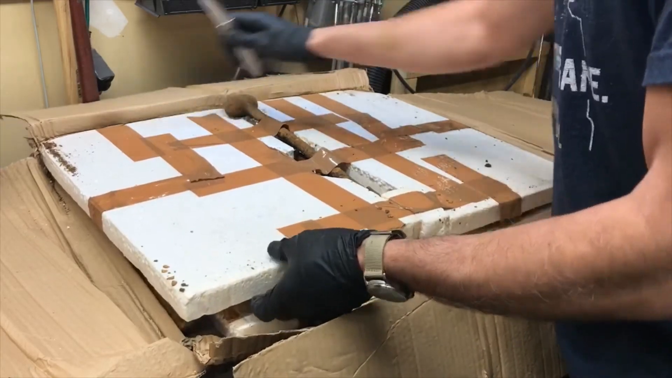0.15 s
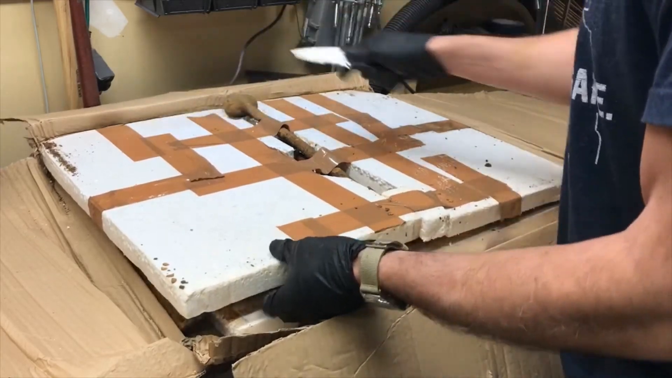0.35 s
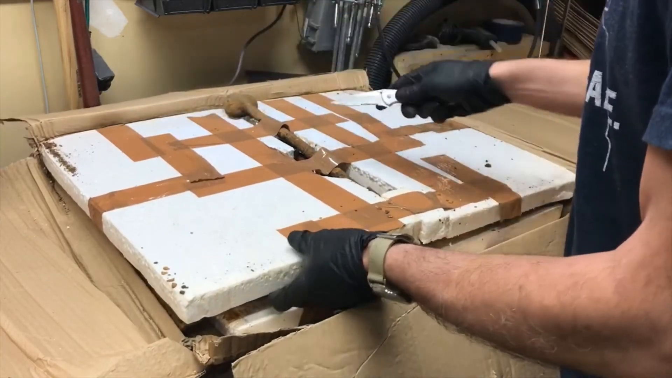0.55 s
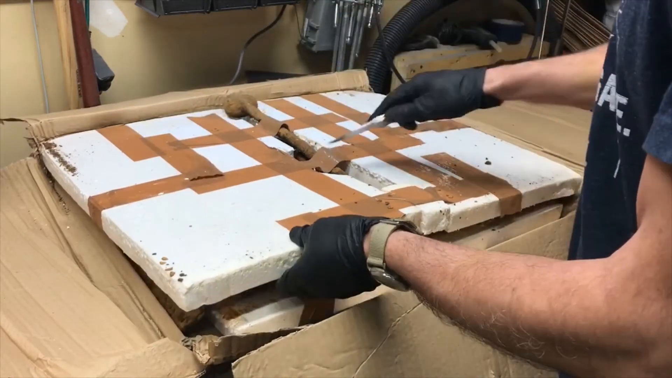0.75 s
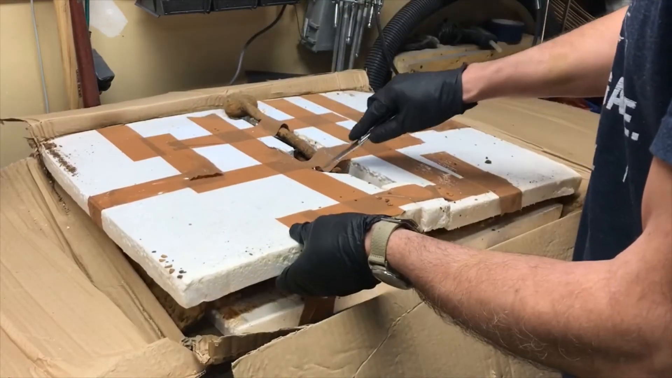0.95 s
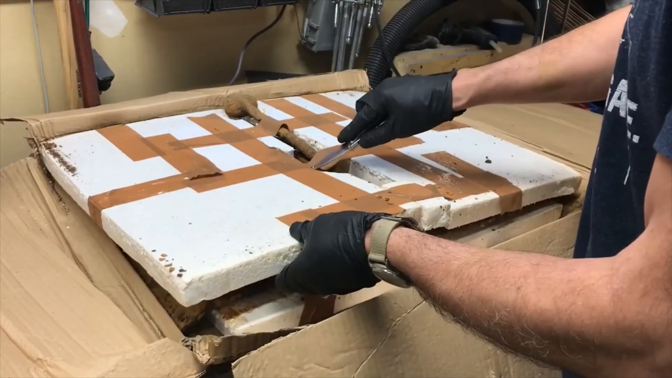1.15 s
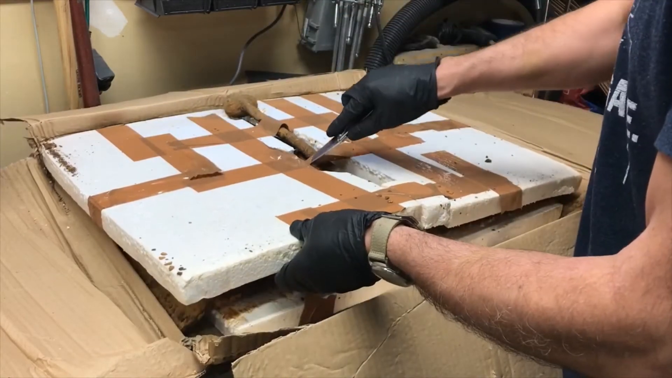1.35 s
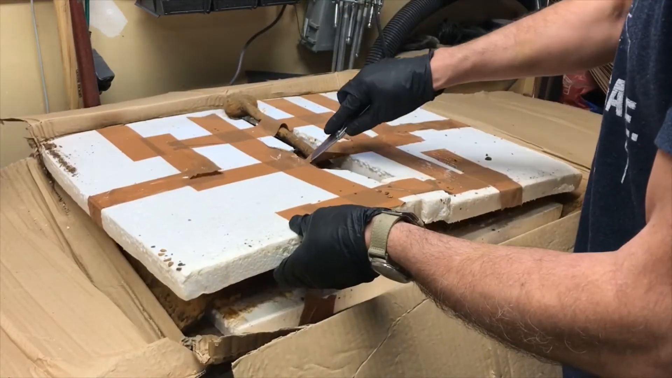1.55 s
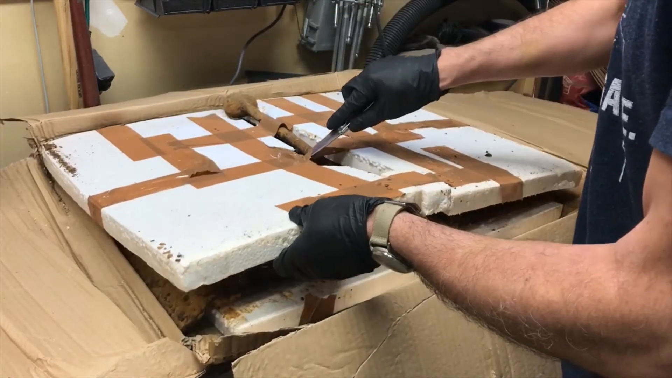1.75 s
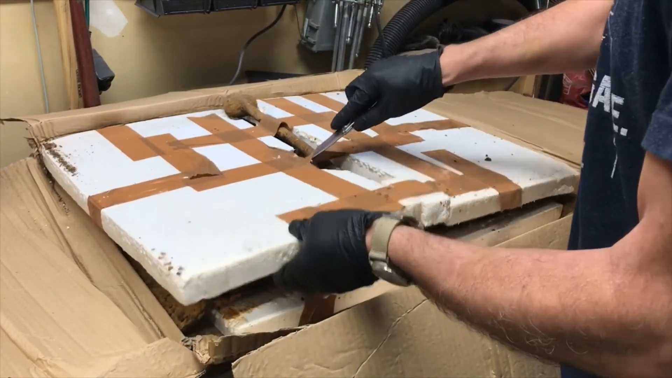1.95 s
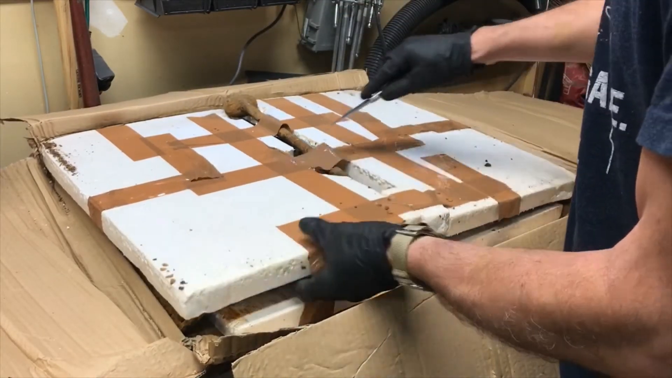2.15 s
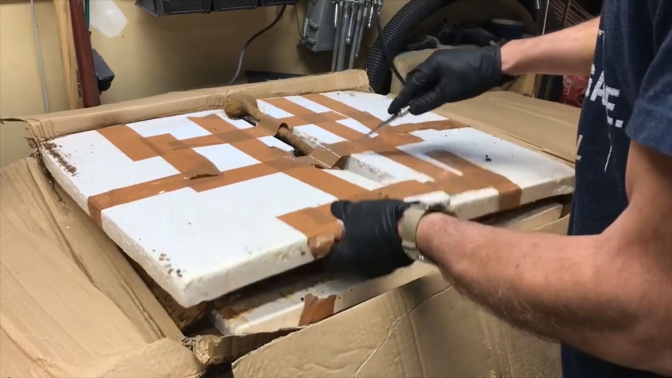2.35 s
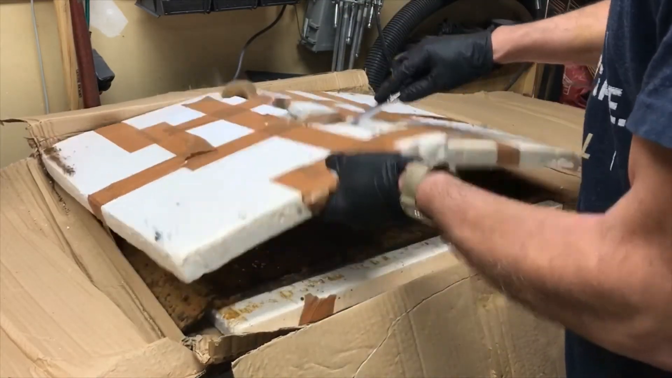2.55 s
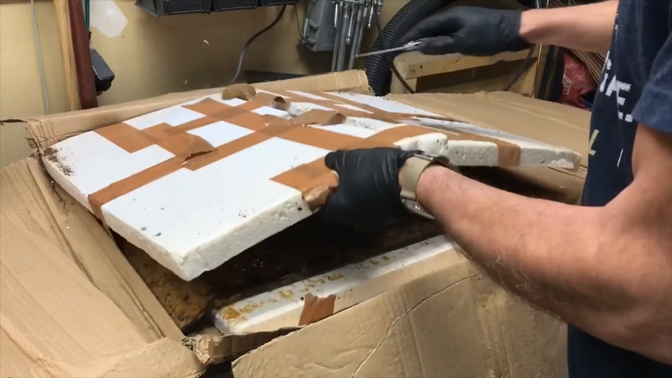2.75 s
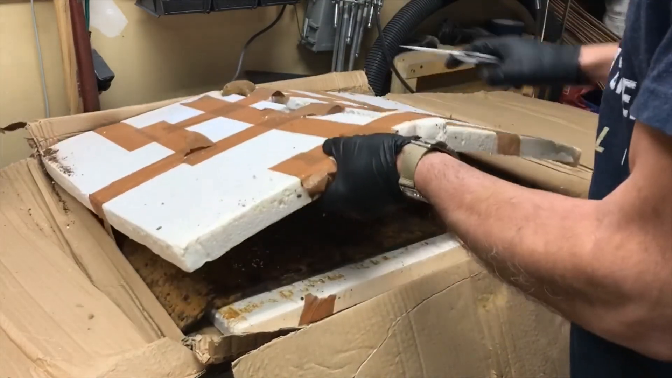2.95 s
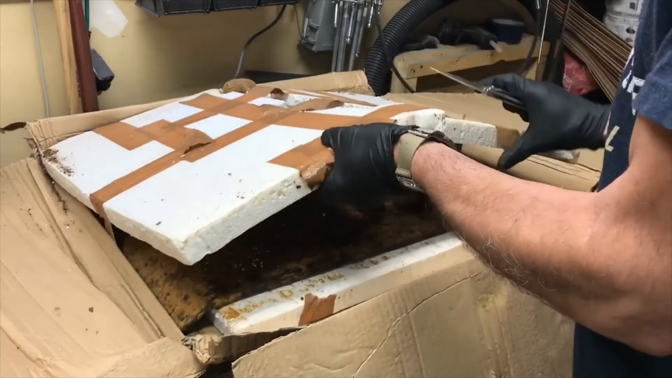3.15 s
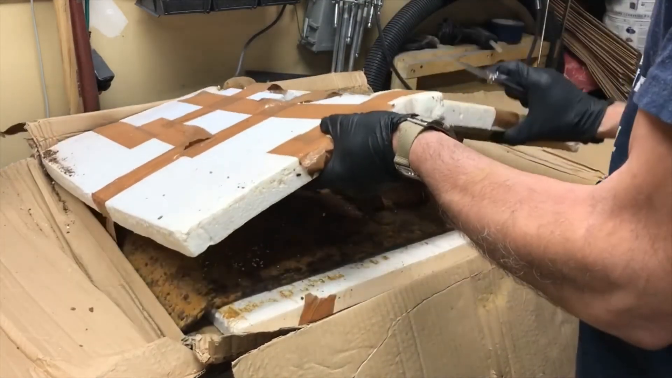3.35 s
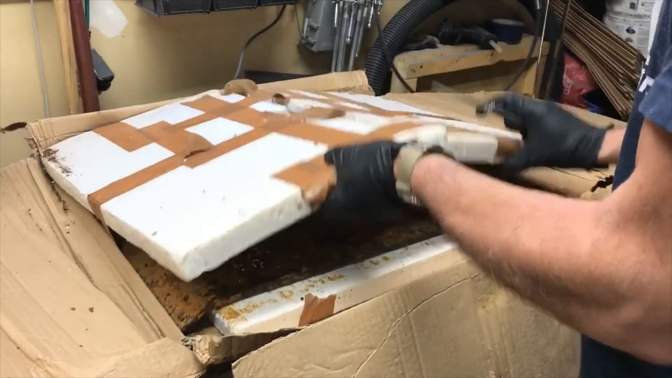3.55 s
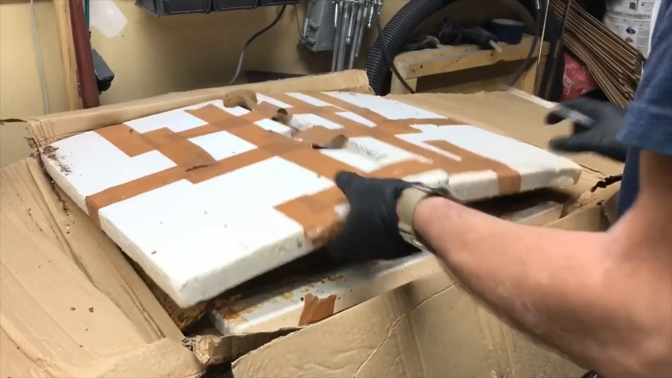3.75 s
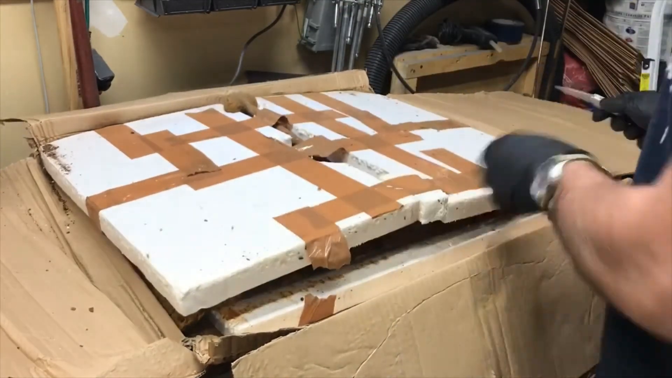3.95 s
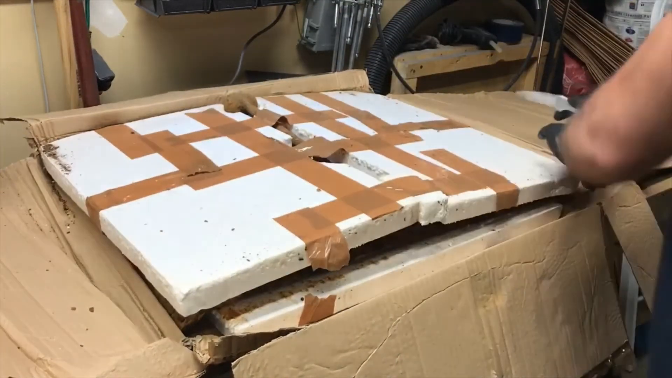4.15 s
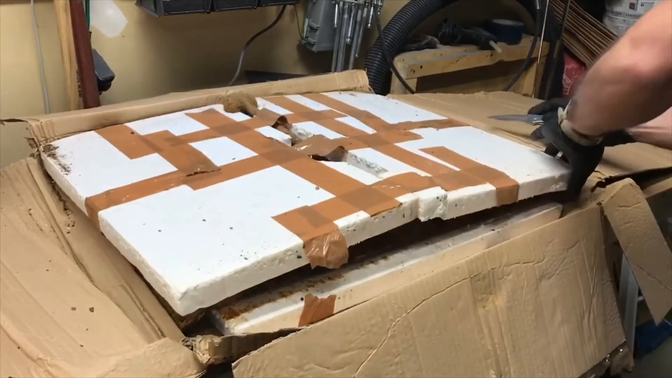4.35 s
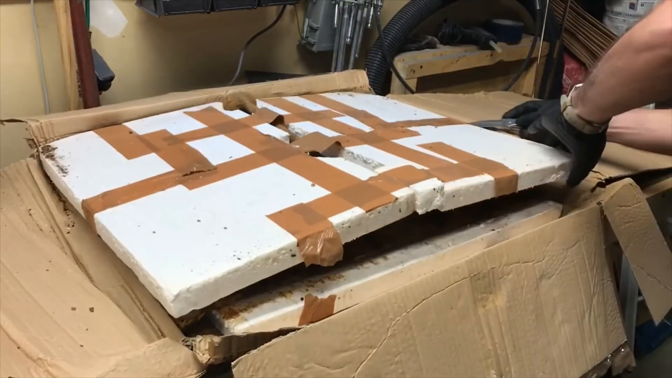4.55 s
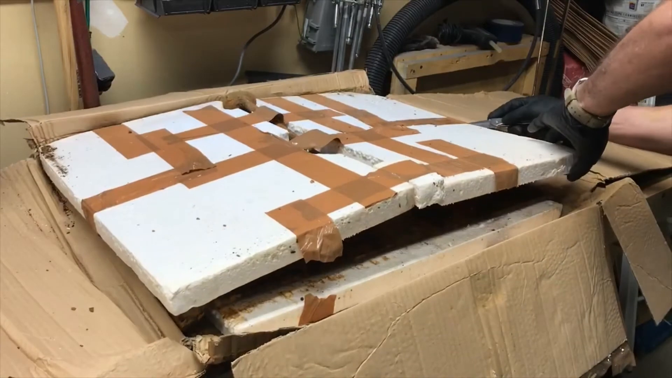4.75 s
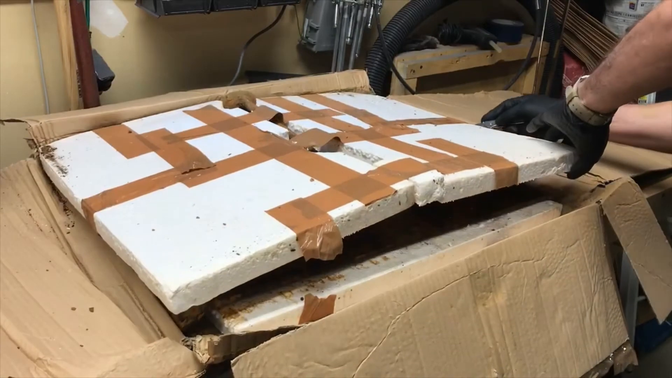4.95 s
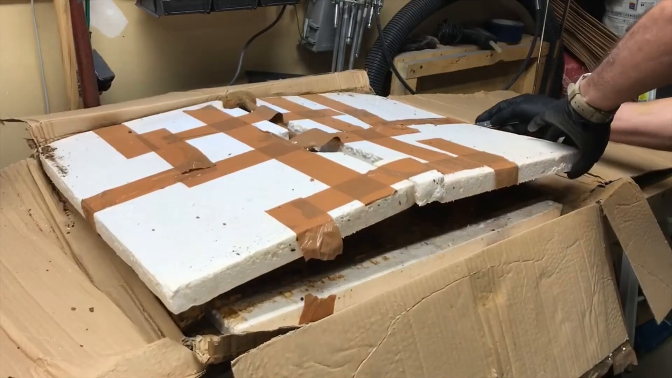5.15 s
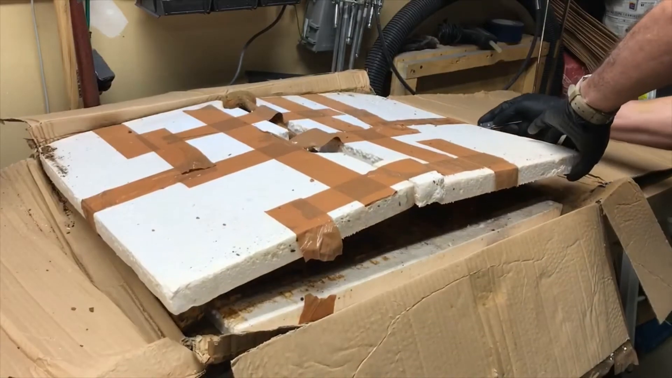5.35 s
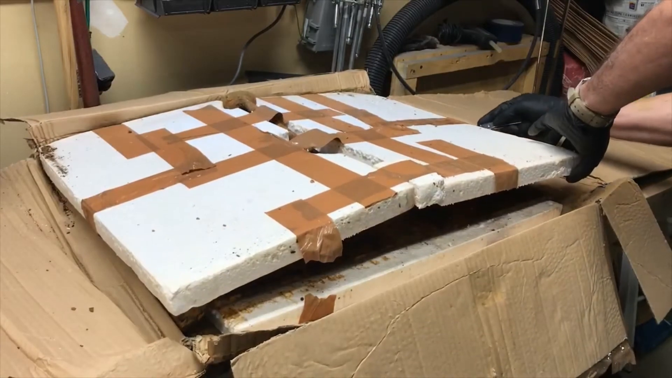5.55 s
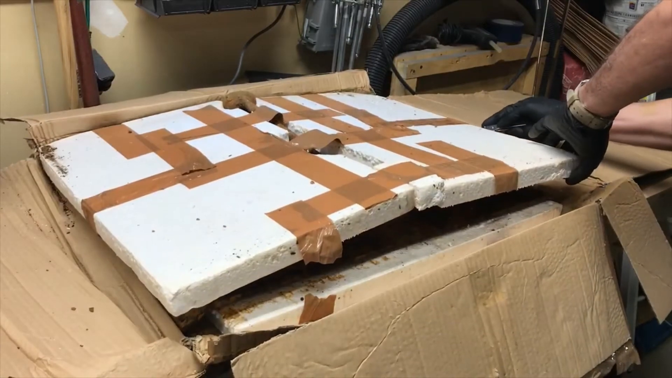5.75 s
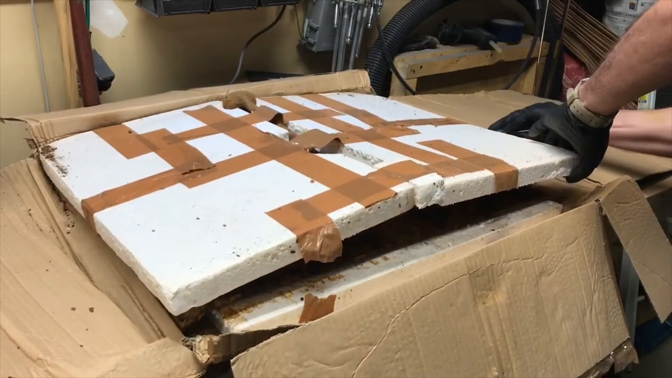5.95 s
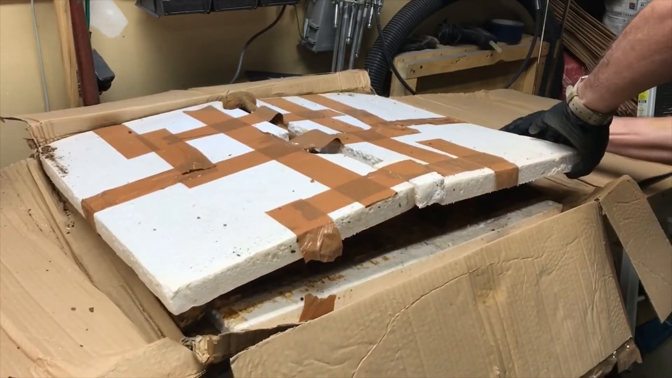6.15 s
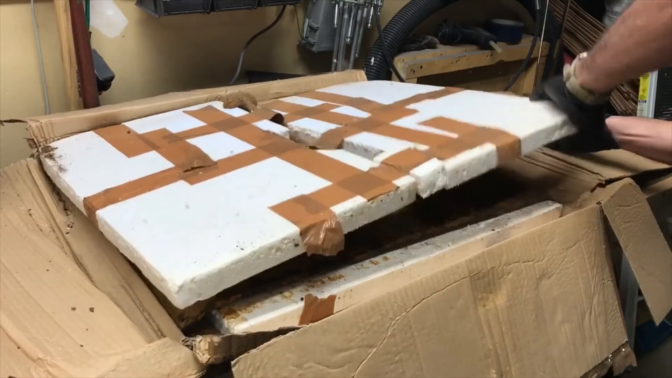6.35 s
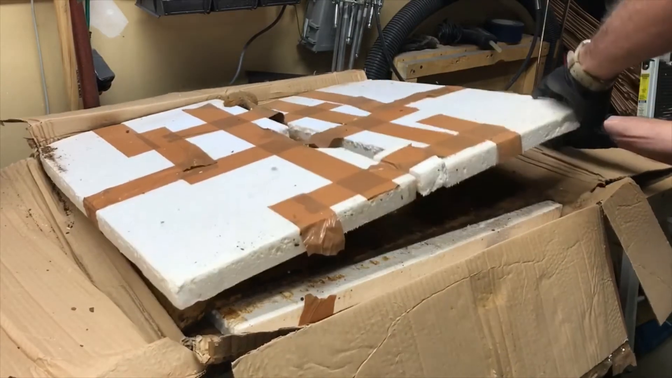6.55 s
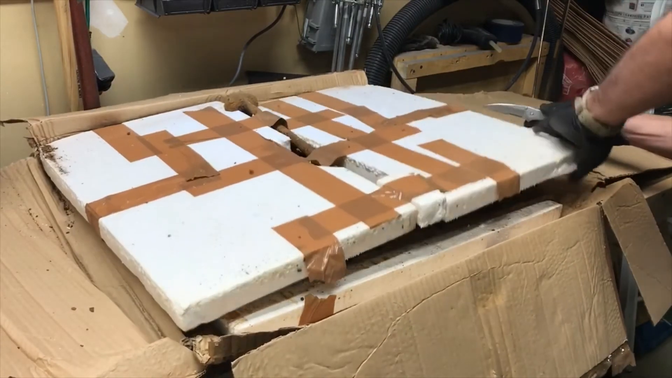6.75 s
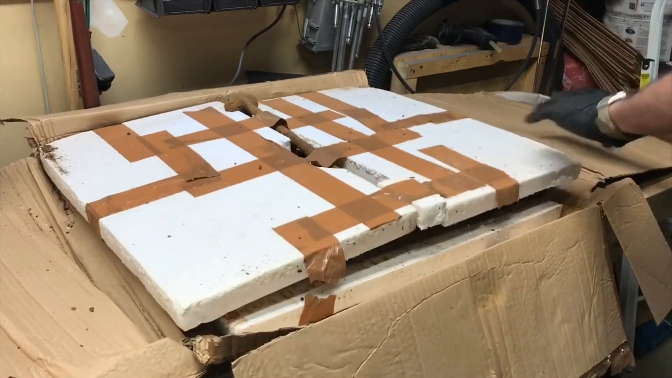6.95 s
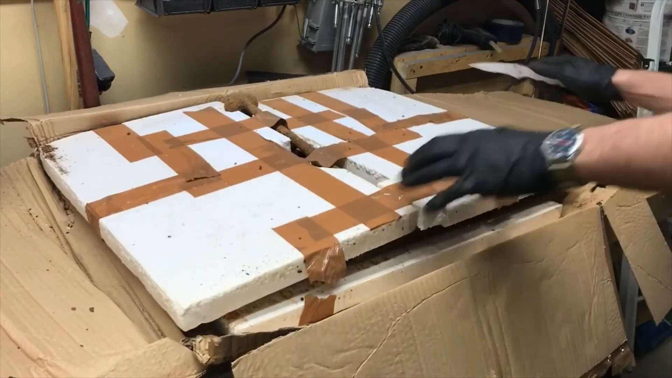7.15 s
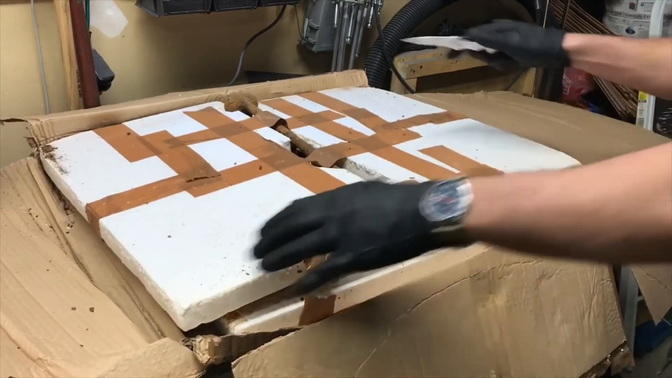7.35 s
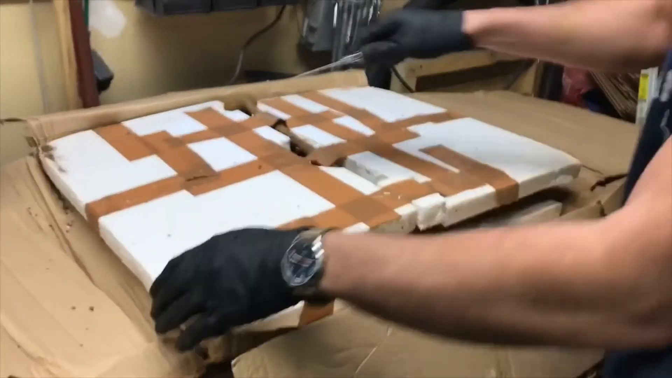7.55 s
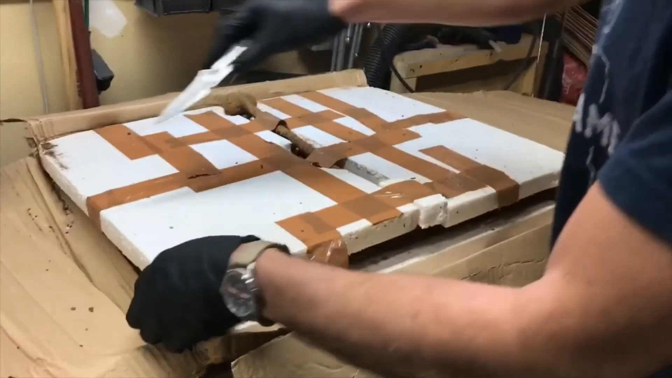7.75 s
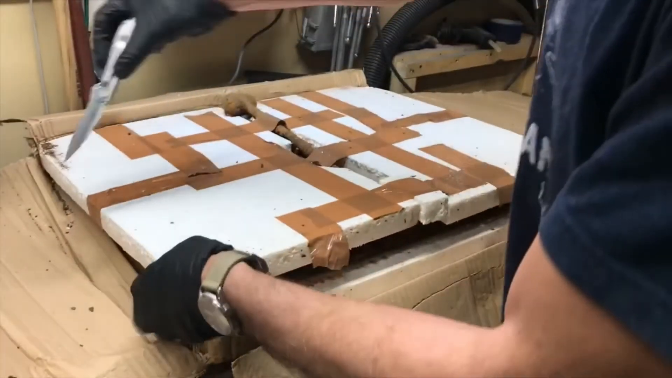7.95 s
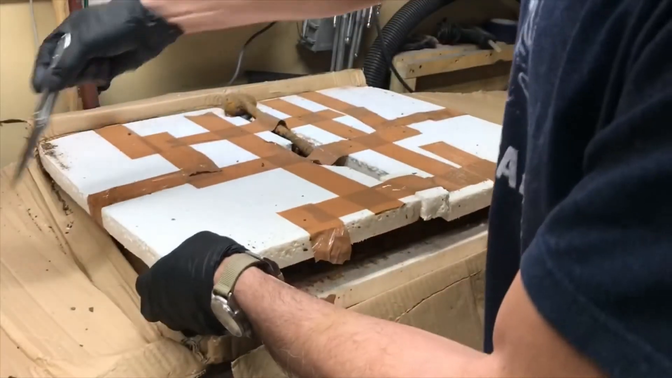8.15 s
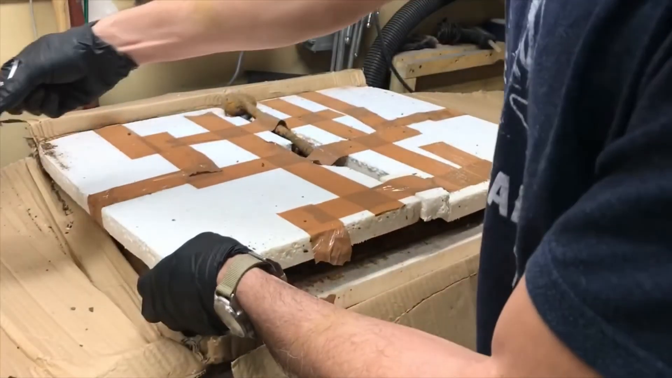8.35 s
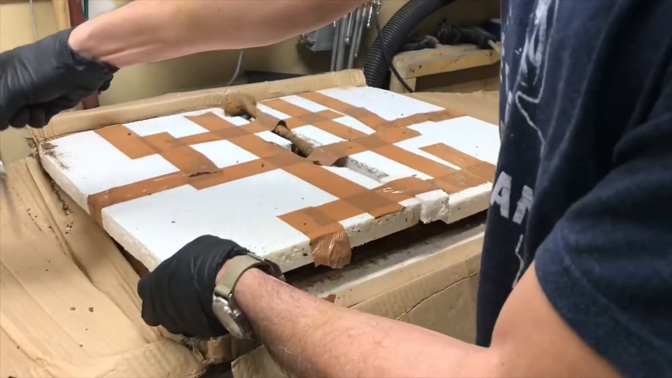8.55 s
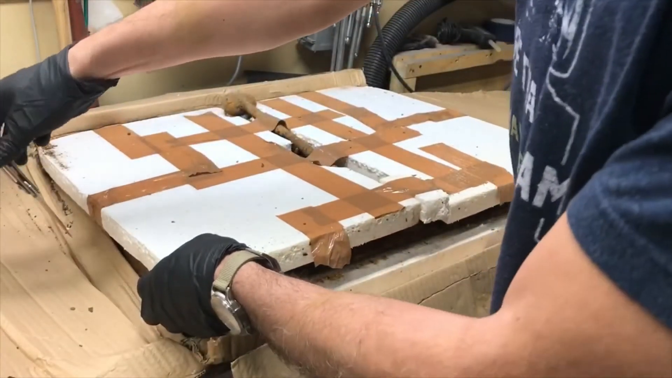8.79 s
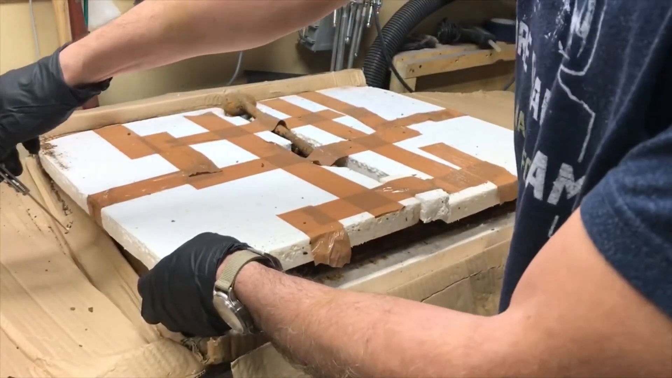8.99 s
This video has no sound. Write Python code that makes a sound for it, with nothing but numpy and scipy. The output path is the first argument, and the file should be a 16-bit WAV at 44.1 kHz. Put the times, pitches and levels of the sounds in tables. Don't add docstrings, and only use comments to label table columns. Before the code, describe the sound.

Gloved hands work tape and foam slabs in a cardboard box: faint ticks and rustles, then sharp cracks, hollow bumps and quiet settling.

```python
import sys
import numpy as np
from scipy import signal
from scipy.fft import rfft, irfft, next_fast_len
from scipy.io import wavfile
from scipy.ndimage import uniform_filter1d

SR = 44100
rng = np.random.default_rng(int(sys.argv[2]) if len(sys.argv) > 2 else 0)


def generate_wav(signal):
    frames = np.transpose(np.atleast_2d(signal))
    scaled = np.clip(frames, -1, 1) * 32767
    pcm = np.round(scaled).astype(np.int16)
    wavfile.write(sys.argv[1], SR, pcm)


def ratio_of_db(decibels):
    return 10 ** (np.asarray(decibels, float) / 20)


N = 397782


def level(x, db):
    return x * ratio_of_db(db) / np.sqrt(np.mean(x ** 2))


def colour(x, points):
    hz, db = np.transpose(points)
    n = next_fast_len(len(x), True)
    f = np.maximum(np.fft.rfftfreq(n, 1 / SR), 1)
    gain = ratio_of_db(np.interp(np.log(f), np.log(hz), db))
    return irfft(rfft(x, n) * gain, n)[:len(x)]


def ring(x, hz, width_hz):
    return signal.lfilter(*signal.iirpeak(hz, hz / width_hz, fs=SR), x)


def double_ring(x, hz, width_hz):
    return ring(ring(x, hz, width_hz), hz, width_hz)


def band(x, order, low_hz, high_hz):
    return signal.sosfilt(signal.butter(order, [low_hz, high_hz], "band", fs=SR, output="sos"), x)


def walk(rate):
    k = int(SR / rate)
    steps = np.repeat(rng.standard_normal(N // k + 1), k)
    return uniform_filter1d(steps, k // 2)[:N]


def grains(rate, spread_db, smear_s):
    strength = ratio_of_db(spread_db * np.minimum(rng.exponential(size=N), 4))
    size = (rng.random(N) < rate / SR) * strength
    decay = np.exp(-1 / (smear_s * SR))
    return rng.standard_normal(N) * signal.lfilter([1], [1, -decay], size)


# (f/Hz, width/Hz, level/dB)
SLAB_MODES = [(640, 240, -4.5), (913, 160, -2), (1130, 200, -1.5), (1486, 269, 2), (1620, 390, 0),
              (2270, 490, -1), (3000, 2000, -7.5)]


def slab(x):
    modes = [ratio_of_db(db) * ring(x, hz, width) for hz, width, db in SLAB_MODES]
    return sum((-1) ** k * mode for k, mode in enumerate(modes))


# (f/Hz, level/dB per Hz)
TAPE_COLOUR = [(1760, -36), (3000, -26), (4290, 0), (5010, -0.5), (6760, 3.5), (10400, -0.5), (12800, 2),
               (15900, -3), (16500, -52.5)]


def tape(x):
    return colour(x, TAPE_COLOUR)


# (peak t/s, swell t/s, fade t/s, foam level/dB, tape level/dB re foam)
PULLS = [(0.0, 0.013, 0.03, -41, 4.5), (0.242, 0.3, 0.36, -45, 0), (0.481, 0.021, 0.51, -46.5, -6),
         (1.145, 0.014, 0.012, -42, -2.5), (1.211, 0.0055, 0.088, -41.5, -6), (1.644, 0.1, 0.12, -42, -15),
         (2.232, 0.61, 1, -43, -1.5), (2.526, 0.014, 0.055, -14.5, -4), (3.414, 1, 0.15, -56.5, 10),
         (3.86, 0.79, 0.13, -36.5, -9), (4.659, 0.91, 0.19, -48, -16.5), (5.362, 0.075, 0.024, -53, -30),
         (5.636, 0.13, 0.062, -46.5, -11), (5.932, 0.07, 0.23, -44, -14), (6.4, 0.039, 0.7, -38, -5.5),
         (6.825, 0.17, 0.068, -47.5, -24), (6.97, 0.018, 0.041, -64, -24), (7.342, 0.037, 0.18, -74, -35),
         (7.6, 0.022, 0.055, -62.5, 16.5), (7.666, 0.034, 0.24, -37, -5.5), (8.03, 0.03, 0.081, -40.5, -21),
         (8.306, 0.016, 0.011, -51, 0.5), (8.553, 0.27, 0.0053, -59, 1), (8.56, 0.024, 0.71, -65, -0.5)]
# (start t/s, end t/s, foam level/dB, tape level/dB re foam)
SCRAPES = [(0.186, 0.21, -46.5, -3), (0.523, 0.631, -61, 15.5), (1.252, 1.32, -39, -5.5),
           (1.596, 1.63, -50, 10), (1.642, 1.684, -43, -15), (2.139, 2.302, -45, 7), (2.27, 2.5, -58, -13),
           (2.498, 2.542, -36, -24), (2.63, 3.02, -41.5, -5), (3.015, 3.23, -46, -29),
           (3.538, 3.643, -46.5, 6), (3.746, 3.843, -43.5, 7.5), (4.068, 4.218, -76, 13),
           (4.183, 4.233, -54, -35), (4.238, 4.273, -38.5, 0.5), (4.272, 4.305, -41, -3.5),
           (4.309, 4.595, -44, -4), (5.114, 5.21, -52, -13), (5.316, 5.378, -50.5, -33),
           (5.515, 5.57, -49, 3.5), (5.59, 5.655, -62, 1), (6.759, 6.875, -44, 1.5),
           (7.748, 7.792, -67, 24), (7.927, 7.95, -48, 15.5), (7.984, 8.03, -49, 6.5),
           (8.695, 8.744, -70, -0.5), (8.9, 8.973, -69, -0.5)]


def effort():
    t, foam_gain, tape_gain = np.arange(N) / SR, 0, 0
    moves = []
    for s, swell, fade, db, tape_db in PULLS:
        shape = ratio_of_db(-15 * np.maximum((s - t) / swell, (t - s) / fade))
        moves.append((shape, db, tape_db))
    for start, end, db, tape_db in SCRAPES:
        corners = [start - 0.006, start + 0.0052, end - 0.012, end + 0.0027]
        moves.append((np.interp(t, corners, [0, 1, 1, 0]), db, tape_db))
    for shape, db, tape_db in moves:
        foam_gain = foam_gain + ratio_of_db(db) * shape
        tape_gain = tape_gain + ratio_of_db(db + tape_db) * shape
    return foam_gain, tape_gain


def rustle():
    foam_gain, tape_gain = effort()
    flurry, own_flurry = ratio_of_db(1.2 * walk(30)), ratio_of_db(2 * walk(30))
    slips = level(grains(2200, 4.4, 0.0024) * flurry, 0)
    foam_slips = level(grains(2700, 1.4, 0.0023) * own_flurry, -12.5)
    tape_slips = level(grains(3000, 1.8, 0.0014) * ratio_of_db(walk(45)), -25.5)
    foam_sound = level(slab(slips + foam_slips), -4)
    tape_sound = level(tape(slips + tape_slips), -5)
    box_sound = level(double_ring(slips, 350, 380), -23.5)
    return foam_gain * (foam_sound + box_sound) + tape_gain * tape_sound


# (f/Hz, level/dB per Hz)
HUM_COLOUR = [(15, -39.5), (25, -0.5), (70, 9), (476, -12.5), (1100, -13), (3520, -25.5), (4250, -24),
              (4870, -38.5), (6210, -27.5), (12900, -41.5), (16000, -35)]


def hum():
    hum_db = -59
    murmur = colour(rng.standard_normal(N), HUM_COLOUR) * ratio_of_db(1.5 * walk(6))
    settling = tape(grains(1200, 2.0, 0.0026)) * ratio_of_db(3.7 * walk(6.6))
    return level(murmur, hum_db) + level(settling, hum_db - 15.5)


# (f/Hz, t/s)
ROOM_T60 = [(125, 0.97), (350, 0.58), (1000, 0.56), (2500, 0.61), (5500, 0.35), (12000, 0.28)]
# (f/Hz, level/dB)
ROOM_COLOUR = [(330, 7), (650, 5), (1130, 3), (1600, 1.5), (2500, -2.5), (4300, -1.5), (7500, -2),
               (10000, -3), (14000, -1.5)]


def room(x, count=5):
    t, out = np.arange(SR // 2 + SR // 4) / SR, 0
    place = np.arange(N) / SR / 0.004
    for k in range(count):
        tail = 0
        for hz, t60 in ROOM_T60:
            noise = double_ring(rng.standard_normal(len(t)), hz, 1.7 * hz)
            tail = tail + noise * 1000 ** (-t / t60)
        tail = tail * (1 - np.exp(-t / 0.00031)) * (1 + 2 * np.exp(-t / 0.0068))
        here = np.sqrt(np.clip(1 - np.abs((place - k) % count - 1), 0, 1))
        out = out + signal.fftconvolve(x * here, tail / np.sqrt(np.sum(tail ** 2)))[:N]
    return colour(out, ROOM_COLOUR)


# (t/s, peak level/dB, f/Hz, time to die by 60 dB t/s, cardboard scuff level/dB re peak)
THUMPS = [(0.002, -44, 166, 0.24, 3), (1.256, -33.5, 209.4, 0.1, -2), (2.536, -19.5, 192.2, 0.18, -3.5),
          (2.547, -30, 49, 0.61, 1.5), (2.572, -18.5, 103, 0.19, -13.5), (2.999, -34, 94, 0.29, -3.5),
          (3.392, -30.5, 256.3, 0.36, 0.5), (3.868, -43.5, 88.4, 0.65, -21), (6.117, -30.5, 154.4, 0.27, 0),
          (6.282, -23, 188.8, 0.32, 2), (7.389, -38, 194, 0.14, 8.5), (7.407, -26, 97, 0.17, -4.5),
          (7.434, -50, 101, 0.32, 9)]


def thumps():
    n = 16384
    out, t = np.zeros(N + n), np.arange(n) / SR
    for s, db, hz, t60, scuff_db in THUMPS:
        phase = 2 * np.pi * hz * t
        boom = np.sin(phase) + 0.57 * np.sin(2.1 * phase) + 0.23 * np.sin(1.6 * phase)
        scuff = level(band(rng.standard_normal(n), 4, 70, 270), scuff_db)
        swell_and_fade = (1 - np.exp(-t / 0.0023)) * 1000 ** (-t / t60)
        out[int(s * SR):][:n] += ratio_of_db(db - 5.5) * (boom + scuff) * swell_and_fade
    return out[:N]


# (f/Hz, level/dB, time to die by 60 dB t/s)
AIR_GAP = [(1120, -8, 0.19), (1070, -17, 0.28), (1116, -23, 0.45), (640, -12, 0.26), (850, -23.5, 0.15)]


def air_gap(x):
    return sum(ratio_of_db(db) * ring(x, hz, np.log(1000) / (np.pi * t60)) for hz, db, t60 in AIR_GAP)


# (t/s, peak level/dB, f/Hz, tape tick level/dB re peak)
BREAKS = [(1.252, -19, 1940, -2.5), (1.619, -14, 2460, -17.5), (2.508, -36, 1080, -44),
          (2.5205, -9, 1490, -22), (2.526, -20, 1360, -14), (2.532, -26.5, 2200, -22),
          (2.54, -10.5, 1000, 0), (2.547, -18.5, 613, -18), (2.553, -11.5, 1350, -4),
          (2.565, -22.5, 563, 4), (2.752, -23, 1104, -10), (2.831, -15, 2270, -8),
          (2.845, -13.5, 4500, -36), (2.928, -9.5, 1780, -15), (2.97, -19.5, 1230, -17),
          (3.046, -22, 1500, -2), (3.2435, -11.5, 1650, -9), (3.256, -18, 850, -13),
          (3.352, -13, 1680, -10), (3.3775, -7, 1330, -9), (3.391, -17, 1380, 0), (3.4025, -3.5, 1250, -7),
          (3.7335, -20, 1410, -12), (3.8815, -20.5, 1150, -8), (5.735, -18, 2630, -12),
          (5.937, -22.5, 1380, -16), (6.1163, 4, 1650, -15), (6.1195, -6.5, 910, -15),
          (6.279, 5, 2880, -10.5), (6.2825, -2, 1180, -27.5), (6.592, -18.5, 2980, -7),
          (6.687, -20, 1520, -3), (6.735, -19.5, 1620, -16), (7.675, -11, 2770, -39),
          (8.018, -17.5, 1730, -17)]
# (t/s, peak level/dB, f/Hz, tape tick level/dB re peak)
SMALL_BREAKS = [(0.17, -33, 1470, -25), (0.249, -29, 1170, -22), (1.094, -34, 1500, -11), (1.648, -23, 1342, -22),
                (1.723, -26, 1220, -7.5), (1.965, -25.5, 1400, 1.5), (2.01, -26.5, 1300, 2.5),
                (2.071, -24, 1620, -3), (2.14, -25, 1570, -3), (2.413, -26.5, 1190, -2), (3.2, -38, 1290, 11),
                (3.553, -24, 1120, 1), (3.759, -22, 1420, -1), (4.033, -35, 1350, -1), (4.138, -19, 1750, -30),
                (4.362, -22, 2500, -8), (4.467, -22, 1620, 0), (4.526, -34.5, 1350, 6.5), (4.679, -32.5, 1130, 1),
                (4.858, -24, 742, -6), (4.043, -29, 1510, -9), (4.216, -33, 1500, -14), (5.36, -34, 1500, -25),
                (2.766, -17, 1090, -5), (5.226, -36.5, 1200, 5.5), (5.261, -24, 1720, -5.5),
                (5.403, -30.5, 1310, -48), (5.482, -22.5, 1670, -18), (6.074, -25, 1420, -18),
                (6.44, -18.5, 1060, -5), (6.533, -26, 1100, -23), (6.611, -21.5, 1430, -25),
                (7.674, -23, 1500, -35), (8.089, -20.5, 1540, -6.5)]
# (t/s, peak level/dB, f/Hz)
SNAPS = [(0.087, -30, 2000), (0.386, -42, 2370), (0.643, -26.5, 1870), (0.858, -35, 5900),
         (0.911, -34, 4230), (1.196, -30, 2630), (1.213, -23, 2620), (1.296, -27, 3020),
         (1.438, -24.5, 7750), (1.601, -28, 2270), (1.799, -28, 2360), (3.7037, -18.5, 2420),
         (4.198, -24.5, 1750), (4.235, -26, 2340), (4.403, -20.5, 1910), (4.806, -23.5, 6740),
         (5.243, -23, 3500), (5.548, -30, 2190), (5.629, -21.5, 4330), (6.645, -18, 5340),
         (6.677, -21.5, 1830), (6.954, -21.5, 4460), (7.143, -19.5, 6300), (7.33, -27.5, 2530),
         (7.331, -31.5, 1060), (7.387, -21, 6800), (7.769, -25, 2070), (7.928, -26, 6700),
         (8.041, -25, 2060), (8.044, -33, 2400), (8.037, -21, 1430)]
# (t/s, peak level/dB, f/Hz)
MORE_SNAPS = [
    (4.124, -30.5, 7700),
    (6.9645, -30, 5200),
    (7.034, -36, 5030),
    (7.130, -44, 4000),
    (7.23, -36.5, 3000),
    (7.305, -41, 2490),
    (7.478, -33, 6240),
    (7.635, -32, 1620),
    (8.03, -31, 1500),
    (8.305, -36, 2540),
]


def cracks():
    snap, tick, push, carry = np.zeros((4, N + 2048))
    n = 1024
    t = np.arange(n) / SR
    tear_level = np.array([[0.13], [0.42], [0.17]])
    tear_s = np.array([[0.0014], [0.0019], [0.0014]])
    deep = [(*row, 1.25) for row in list(BREAKS) + list(SMALL_BREAKS)]
    light = [(s, db, hz, -16, 0.8) for s, db, hz in list(SNAPS) + list(MORE_SNAPS)]
    for s, db, hz, tick_db, width in deep + light:
        i = int((s + 0.0008) * SR)
        burst = tear_level * rng.standard_normal((3, n)) * np.exp(-t / tear_s)
        burst[:, 0] = 1
        tone = double_ring(burst[0], hz, width * hz)
        snap[i:i + n] += ratio_of_db(db - 6) * tone / np.abs(tone).max()
        tick[i:i + n] += ratio_of_db(db + tick_db) * burst[1]
        push[i:i + n] += ratio_of_db(db - 34 * np.abs(np.log2(hz / 950))) * burst[2]
        carry[i:i + 2048] = np.maximum(carry[i:i + 2048], ratio_of_db(0.11 * db))
    bright = band(tick, 2, 2300, 12500)
    gap = air_gap(snap * carry ** 2)
    sound = snap + ratio_of_db(3) * bright + ratio_of_db(6) * slab(push) + ratio_of_db(19) * gap
    return sound[:N], np.maximum(carry, ratio_of_db(-8.5))[:N]


# (start t/s, end t/s, level/dB, patch f/Hz)
RUBS = [(.168, 0.174, -50, 1480), (0.244, 0.272, -49, 3200), (.545, 0.626, -58, 6000),
        (1.593, 1.636, -43.5, 2390), (1.635, 1.673, -49, 1470), (1.731, 1.734, -49, 3280),
        (1.77, 1.78, -51, 1220), (1.798, 1.82, -52, 1200), (2.534, 2.557, -28, 1360),
        (3.76, 3.78, -43, 1290), (3.824, 3.826, -45, 1120), (4.141, 4.163, -46.5, 840),
        (7.997, 8.014, -51, 2750), (8.036, 8.031, -46, 5200), (6.117, 6.13, -24.5, 854),
        (4.198, 4.202, -49, 2200), (4.236, 4.275, -49, 2400), (4.252, 4.272, -46, 1390),
        (5.113, 5.203, -61, 4100), (5.323, 5.374, -54.5, 1580), (5.594, 5.655, -50, 2560),
        (7.146, 7.165, -54, 7000), (7.765, 7.788, -48, 1950), (8.038, 8.05, -39.5, 2350),
        (8.031, 8.046, -41.5, 1420), (8.098, 8.177, -57, 1470)]


def rubs():
    out, slips = np.zeros(N), grains(1900, 4.1, 0.0013)
    for start, end, db, hz in RUBS:
        i, n = int((start - 0.004) * SR), int((end - start + 0.011) * SR)
        patch = ring(slips[i:i + n] + 1e-9, hz, 0.097 * hz)
        out[i:i + n] += level(patch, db) * signal.windows.tukey(n, 0.5)
    return out


# (t/s, peak level/dB, f/Hz)
KNIFE_TICKS = [(0.6244, -35, 5750), (0.645, -26, 6600), (0.6914, -51, 3500), (0.787, -39, 4610),
               (0.874, -32.5, 6140), (0.9284, -40, 7450), (0.9374, -53, 4270), (0.9926, -52, 3460),
               (1.0266, -32, 8900), (1.0654, -53, 4230), (1.1003, -34, 7250), (1.1169, -54, 7230),
               (1.1374, -40, 3830), (1.219, -31, 9000), (1.2684, -21, 4280), (1.4162, -37.5, 5420),
               (1.4505, -34, 11140), (1.5015, -41, 5370), (1.6576, -40, 4590), (1.6793, -48, 3920),
               (1.7494, -31, 3980), (1.7738, -38, 4600), (1.7973, -20.5, 8550), (1.854, -37, 6500),
               (1.9068, -49, 3960), (1.9866, -32, 9120), (2.269, -20.5, 6720), (2.388, -34, 5780),
               (2.5089, -17, 6420), (2.7743, -19, 4530), (2.7814, -23, 3750), (2.809, -23, 3730),
               (2.8464, -21, 4590), (2.9692, -25, 3500), (3.0061, -25, 8610), (3.024, -31, 9990),
               (3.0437, -19, 4330), (3.0844, -34, 5830), (3.1334, -44, 6430), (3.1557, -41, 6370),
               (3.262, -22, 9870), (3.3296, -26, 4070), (3.4955, -28, 6640), (3.5192, -27, 4620),
               (3.544, -31, 5580)]
# (t/s, peak level/dB, f/Hz)
LIFT_TICKS = [(3.8414, -28, 4550), (3.865, -25, 4480), (3.9045, -32, 4450), (4.0687, -40, 4530),
              (4.152, -29, 9660), (4.214, -33, 7100), (4.3942, -25, 3600), (4.5516, -32, 6030),
              (4.5885, -30.5, 5300), (4.775, -42, 9400), (4.8304, -44.5, 6600), (5.5266, -29, 4660),
              (5.6431, -31, 3980), (5.8351, -42, 4120), (5.9005, -40, 8450), (5.9366, -25, 4400),
              (6.4465, -29, 4390), (6.7227, -27.5, 3660), (6.7928, -20.5, 4200), (6.8184, -38, 3670),
              (6.8537, -26, 7560), (6.95, -26, 5450), (6.9618, -33, 5000), (7.5224, -45, 5600),
              (7.5676, -45, 8360), (7.685, -26, 5160), (8.0177, -24, 9560), (8.0324, -40, 4300),
              (8.2933, -35.5, 8400), (8.4178, -51, 9360), (8.9105, -51.5, 5850), (8.9224, -46, 9460),
              (8.957, -50.5, 9400)]
# (t/s, peak level/dB, f/Hz)
RIP_TICKS = [(2.380, -43, 9000), (2.400, -38.5, 9500), (2.5203, -9.5, 5540), (2.529, -15, 6500),
             (2.5415, -29, 3700), (2.5418, -24.5, 8000), (6.095, -44.5, 5000), (6.1207, -3, 4490),
             (6.2777, -21, 5000), (6.2795, -8, 3570), (6.28, -1.5, 8700), (6.338, -27, 12040),
             (8.900, -58.5, 9000)]


def glue_ticks():
    out, n = np.zeros(N), 256
    fade = np.exp(-np.arange(n) / SR / 0.00057)
    for s, db, hz in list(KNIFE_TICKS) + list(LIFT_TICKS) + list(RIP_TICKS):
        tone = double_ring(rng.standard_normal(n) * fade, hz, 0.83 * hz)
        out[int(s * SR):][:n] += ratio_of_db(db - 2) * tone / np.abs(tone).max()
    return out


def scene():
    soft = ratio_of_db(-2) * rustle()
    crack, carry = cracks()
    crack = crack + glue_ticks()
    walls = room(ratio_of_db(-1.5) * carry * crack + ratio_of_db(-7.5) * soft)
    return (soft + hum() + walls + ratio_of_db(-1.5) * thumps() + crack + rubs())[None]


# (t/s, half length t/s, kept below f/Hz, loss level/dB)
DULL_MOMENTS = [(0.049, 0.0087, 2320, -6), (0.116, 0.0015, 1540, -16.5), (0.325, 0.0078, 1530, -8),
                (3.795, 0.0038, 1700, -10), (1.89, 0.012, 1800, -6), (3.992, 0.0057, 1800, -11),
                (4.115, 0.0037, 3220, -11), (4.641, 0.0065, 3000, -12), (4.675, 0.0095, 6900, -29),
                (4.697, 0.0058, 1200, -19), (4.846, 0.005, 1640, -40), (4.996, 0.0059, 1530, -7),
                (5.034, 0.0076, 1620, -3), (5.919, 0.003, 6000, -14), (6.076, 0.0055, 2960, -26),
                (6.239, 0.012, 4800, -84), (6.253, 0.0027, 1900, -14), (6.378, 0.0042, 4470, -8),
                (7.27, 0.0061, 1500, -14), (7.83, 0.019, 2050, -5.5), (8.255, 0.0083, 2800, -13),
                (8.321, 0.0051, 1510, -25), (8.45, 0.0057, 1560, -16.5), (8.494, 0.007, 1524, -15.5),
                (8.681, 0.0062, 990, -11.5), (8.748, 0.0047, 1510, -13.5), (8.984, 0.0062, 1990, -3.5)]
# (t/s, f/Hz, peak level/dB)
LONE_TONES = [(3.795, 679, -42), (3.795, 1410, -42), (3.794, 6850, -41), (3.99, 2800, -59),
              (3.99, 6810.0, -64), (4.63, 2980, -59), (4.63, 4370, -58), (4.63, 6000, -60),
              (4.7, 1070, -56), (4.7, 2070.0, -58), (4.701, 3170.0, -60), (4.7, 3950, -59),
              (4.7, 4580, -63), (4.845, 6560, -70), (6.25, 2600.0, -50), (6.25, 3170.0, -44),
              (6.25, 4250, -54), (6.381, 3320.0, -45), (6.38, 4400, -45), (6.38, 6170, -44),
              (7.272, 4400, -72), (7.275, 8250, -71), (8.255, 2490, -70), (8.255, 3700, -74.5),
              (8.322, 1296, -70.5), (8.32, 2130, -66), (8.322, 2920, -68), (8.322, 4000, -67),
              (8.322, 5330.0, -71.5), (8.445, 2540.0, -73), (8.445, 9500, -71.5), (8.49, 2280, -68),
              (8.49, 5550, -69), (8.49, 8300, -74)]


def dull_moments(x):
    out = np.pad(x, (0, 4096))
    for s, half, hz, db in DULL_MOMENTS:
        i, n = max(int((s - 2 * half) * SR), 0), int(4 * half * SR)
        top = colour(x[i:i + n], [(0.9 * hz, -80), (hz, 0)])
        dip = np.clip(1.6 - 0.8 * np.abs(np.linspace(-2, 2, len(top))), 0, 1)
        out[i:i + len(top)] -= np.sin(np.pi / 2 * dip) ** 2 * (1 - ratio_of_db(db)) * top
    n = int(0.059 * SR)
    for s, hz, db in LONE_TONES:
        tone = np.sin(2 * np.pi * (hz * np.arange(n) / SR + rng.random()))
        out[int(s * SR) - n // 2:][:n] += ratio_of_db(db) * np.hanning(n) * tone
    return out[:N]


def top_cut(x):
    return signal.sosfilt(signal.butter(12, 16950, fs=SR, output="sos"), x)


def record(dry):
    rounded = np.tanh(0.8 * dry[0]) / 0.88
    shelved = colour(rounded, [(15800, 0), (16050, -31.5)])
    mix = dull_moments(shelved)[None]
    return top_cut(mix)


dry = scene()
out = record(dry)
generate_wav(out)
```